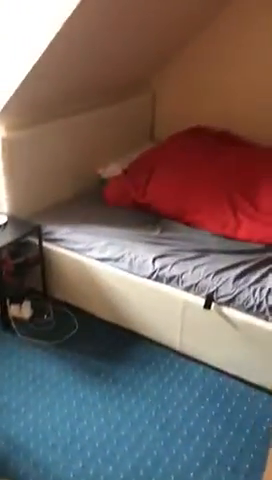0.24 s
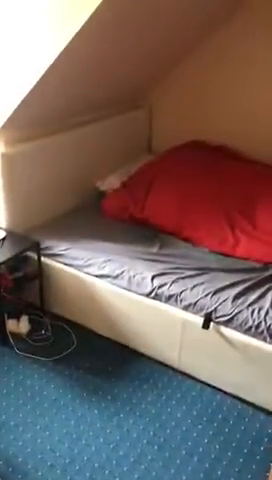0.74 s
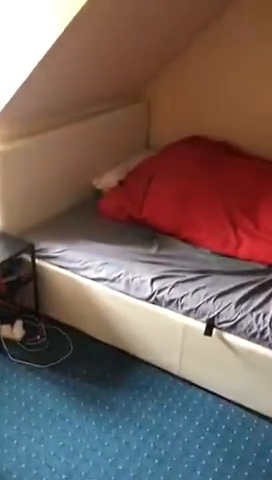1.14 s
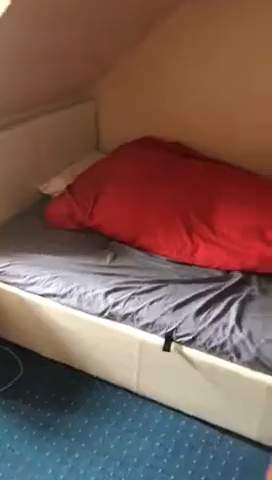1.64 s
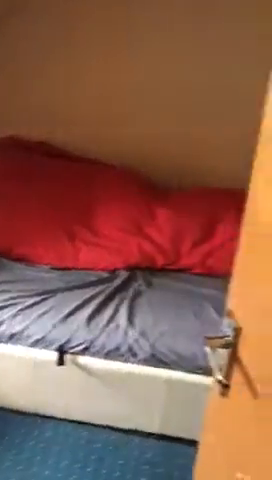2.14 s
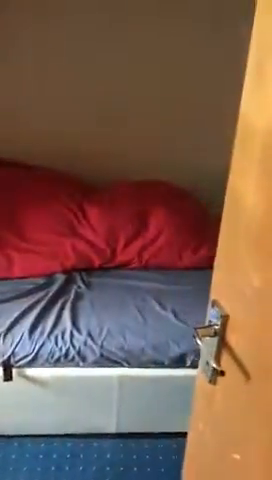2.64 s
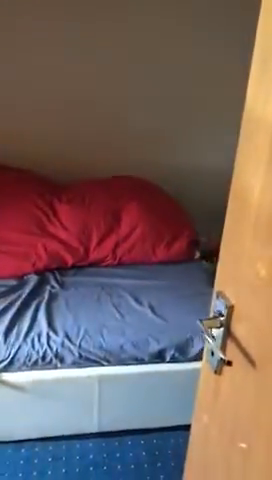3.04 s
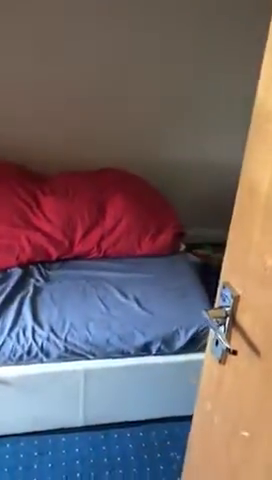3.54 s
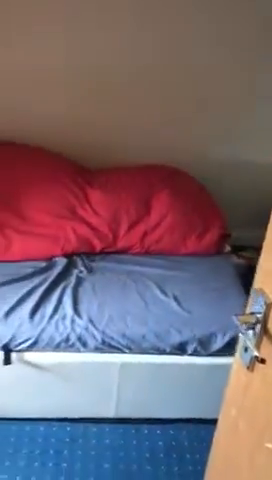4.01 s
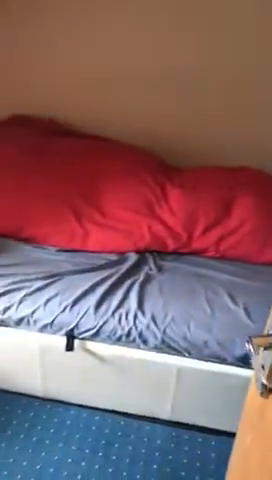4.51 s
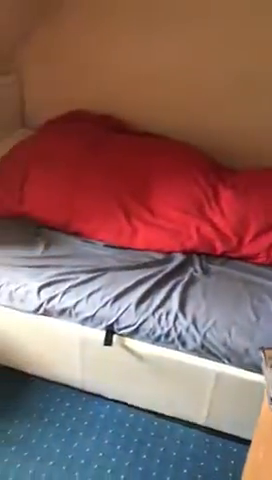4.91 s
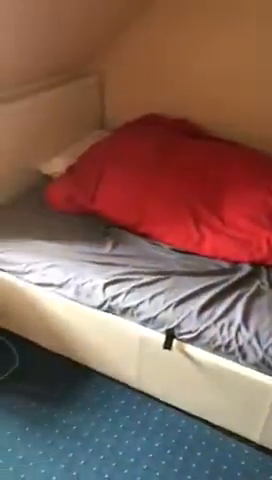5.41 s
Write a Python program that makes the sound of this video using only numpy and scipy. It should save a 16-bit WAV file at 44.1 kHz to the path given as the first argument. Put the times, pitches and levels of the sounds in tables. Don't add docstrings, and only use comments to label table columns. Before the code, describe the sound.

Dull, soft treads and low wooden creaks crowd the first second and a half, with quick finger ticks and a bump on the hand-held microphone. Socks brush carpet, then hollow heel knocks thud on attic boards in a close cluster, thin out, and return after a sharp joint snap. Small, dry carpeted bedroom, faint hush and low house rumble, mono.

```python
import sys
import numpy as np
from scipy import signal
from scipy.fft import rfft, irfft
from scipy.io import wavfile

SR = 44100
rng = np.random.default_rng(int(sys.argv[2]) if len(sys.argv) > 2 else 0)


def waveform_to_disk(signal):
    frames = np.transpose(np.atleast_2d(signal))
    scaled = np.clip(frames, -1, 1) * 32767
    samples = np.round(scaled).astype(np.int16)
    wavfile.write(sys.argv[1], SR, samples)


def voltage_ratio(decibels):
    exponent = np.asarray(decibels, float) / 20
    return 10 ** exponent


N = 249601
BLOW_SAMPLES = SR * 3 // 10


def rms_one(x):
    return x / np.sqrt(np.mean(x ** 2) + 1e-20)


def at_hz(points, hz):
    table = np.array(points)
    return np.interp(np.log(hz + 1), np.log(table[:, 0]), table[:, 1])


def coloured(spectrum, size=N):
    hz = np.arange(size // 2 + 1) * SR / size
    white = rfft(rng.standard_normal(size))
    return rms_one(irfft(white * voltage_ratio(at_hz(spectrum, hz)), size))


def flicker(rate_hz, spread_db):
    r = np.exp(-2 * np.pi * rate_hz / SR)
    drift = signal.lfilter([1], [1, -2 * r, r * r], rng.standard_normal(N + SR))
    return voltage_ratio(spread_db * rms_one(drift[SR:]))


def bell(peak_s, rise_s, fall_s, hold_s=0):
    t = np.arange(N) / SR - peak_s
    return np.exp(-0.5 * np.where(t < 0, t / rise_s, np.maximum(t - hold_s, 0) / fall_s) ** 2)


def swell(hz, swell_s, t):
    u = np.maximum(t, 0) / swell_s
    return (u / 3) ** 3 * np.exp(3 - u) * np.sin(2 * np.pi * hz * t)


# hz, t60_s
ROOM_T60 = [(80, 0.53), (210, 0.42), (560, 0.21), (1470, 0.23), (3880, 0.21), (10000, 0.15)]


def dying(spectrum, build_s, t60_share):
    t = np.arange(BLOW_SAMPLES) / SR
    noise = rfft(coloured(spectrum, size=BLOW_SAMPLES))
    hz = np.arange(len(noise)) * SR / BLOW_SAMPLES
    out = 0
    for low_hz in 40 * 2 ** np.arange(0, 8.5, 0.5):
        in_band = (hz >= low_hz) * (hz < low_hz * np.sqrt(2))
        t60_s = t60_share * at_hz(ROOM_T60, low_hz * 1.2)
        out = out + irfft(noise * in_band, BLOW_SAMPLES) * voltage_ratio(-60 * t / t60_s)
    return out * (1 - np.exp(-t / build_s))


def harder(spectrum, slope_db):
    slope_db = np.clip(slope_db, -12, 5)
    return [(hz, db + slope_db * np.log2(hz / 2000)) for hz, db in spectrum]


def add(out, start_s, sound):
    i = max(round(start_s * SR), 0)
    out[i:i + len(sound)] += sound[:N - i]


# hz, level_db_per_hz
DEEP = [(15, -59), (25, -26), (59, 4), (90, -5.5), (120, -13.5), (200, -120)]
RUMBLE = [(53, -35), (90, -3.5), (129, 1), (178, -11), (250, -6.5), (320, -65), (550, -120)]
DISTANT = [(120, -25), (200, 0.5), (438, -1.5), (588, -2), (739, -4.5), (831, -3), (1500, -19), (1950, -31),
           (3300, -120)]
# peak_s, deep_db, rumble_db
SWAYS = [(0, -62, -61.5), (.25, -75, -73), (.58, -67, -68), (.94, -68.5, -78), (1.28, -84, -66),
         (1.5, -79, -71), (1.86, -75, -73), (2.16, -53, -45), (2.4, -67, -64), (2.65, -67, -72),
         (2.87, -58, -59), (3.1, -84, -76), (3.53, -68, -59.5), (3.66, -64.5, -71), (4.07, -69, -78),
         (4.56, -72, -89), (4.72, -79, -54), (4.87, -59.5, -64), (5.04, -78, -61), (5.2, -74.5, -82)]
# peak_s, level_db
DISTANT_SWELLS = [
    (1, -91),
    (1.95, -78.5),
    (2.6, -64),
    (3.93, -79),
    (4.7, -80),
]


def house():
    deep, rumble, far = voltage_ratio(-83), voltage_ratio(-76.5), voltage_ratio(-74.5)
    for peak_s, deep_db, rumble_db in SWAYS:
        sway = bell(peak_s, rise_s=0.045, fall_s=0.052)
        deep = deep + voltage_ratio(deep_db) * sway
        rumble = rumble + voltage_ratio(rumble_db) * sway
    for peak_s, level_db in DISTANT_SWELLS:
        far = far + voltage_ratio(level_db) * bell(peak_s, 0.083, 0.083)
    out = deep * coloured(DEEP)
    out = out + rumble * flicker(17, 2.24) * coloured(RUMBLE)
    return out + far * flicker(23.5, 2.04) * coloured(DISTANT)


# hz, level_db_per_hz
HUSH = [(710, -25), (1200, -4.5), (2410, -6.5), (2650, -12.5), (3280, -9), (10200, -14), (11200, -14.5),
        (11800, -24), (15300, -55), (22000, -120)]


def hush():
    return voltage_ratio(-76.5) * coloured(HUSH)


# hz, level_db_per_hz
TAIL = [(59, -35), (100, -2.5), (207, 1), (494, 4.5), (786, 0.5), (921, -11), (1090, -17), (1240, -19),
        (1500, -19), (1950, -47), (3300, -120)]
CRACK = [(470, -14), (800, -9.5), (1070, -3), (1250, -12), (1490, -14.5), (2090, -12.5), (2280, -15),
         (3530, -19.5), (5330, -27.5), (5700, -31.5), (11500, -41.5), (15000, -78), (22000, -120)]
# start_s, peak_db, ring_hz, crack_db, hardness_db_per_octave
TREADS = [(0.043, -47.5, 470, -63.5, 3.5), (0.064, -39.5, 600, -52.5, -1), (0.107, -37.5, 496, -49.5, 2.5),
          (0.13, -33, 486, -64, 6), (0.165, -35.5, 447, -57, -2), (0.404, -42.5, 490, -59.5, -3.5),
          (0.4543, -31, 526, -52.5, -1), (0.468, -36, 490, -61, 1.5), (0.512, -35, 503, -60.5, -0.5),
          (0.57, -35, 565, -53, -3), (0.648, -28, 477, -48.5, -4), (0.786, -56, 453, -56, -13),
          (1.045, -46, 558, -69, 5), (1.208, -44, 646, -57, 18), (1.308, -46, 577, -62, -4),
          (1.342, -40.5, 547, -58.5, 0), (1.354, -49, 590, -59, -2.5), (1.503, -48.5, 553, -55.5, -4),
          (2.223, -41.5, 660, -65.5, -3)]


def treads():
    out, t = np.zeros(N), np.arange(BLOW_SAMPLES) / SR
    for start_s, peak_db, ring_hz, crack_db, hardness_db in TREADS:
        body = swell(ring_hz, 0.0011, t)
        body = body + voltage_ratio(-23) * swell(1.76 * ring_hz, 0.001, t)
        body = body + voltage_ratio(-7) * dying(TAIL, 0.0044, 0.84)
        add(out, start_s + 0.00046, voltage_ratio(peak_db) * body)
        crack = dying(harder(CRACK, hardness_db), 0.00083, 0.9) * (1 + 0.86 * np.exp(-t / 0.005))
        add(out, start_s - 0.0005, voltage_ratio(crack_db - 2) * crack)
    return out


def creak(modes, slips_per_s):
    out = 0
    for hz, width_hz, level_db in modes:
        slips = (rng.random(N) < slips_per_s / SR) * voltage_ratio(1.6 * rng.exponential(1, N))
        slips = slips * rng.choice([-1, 1], N)
        r = np.exp(-np.pi * width_hz / SR)
        poles = [1, -2 * r * np.cos(2 * np.pi * hz / SR), r * r]
        out = out + voltage_ratio(level_db) * rms_one(signal.lfilter([1, 0, -1], poles, slips + 1e-18))
    return rms_one(signal.sosfilt(signal.butter(1, 1500, fs=SR, output="sos"), out))


# hz, width_hz, level_db
STAIR_LOW = [(207, 31, -11), (263.2, 17, -5), (304.4, 28, -9.5)]
STAIR_HIGH = [(426, 44, 9.5), (490, 160, -19), (563, 73, 13), (680, 53, -32.5), (940, 64, -1)]
# start_s, hold_s, low_creak_db, high_creak_db
LOADS = [(0.065, .02, -56, -52), (0.105, 0.098, -50, -57.5), (0.432, .03, -52.5, -70),
         (0.461, 0.027, -62, -55.5), (0.546, 0.049, -49.5, -66), (0.656, 0.074, -56.5, -65),
         (1.112, 0.019, -61.5, -69.5), (1.17, 0.052, -55, -78), (1.267, 0.079, -58, -61),
         (1.377, 0.036, -60.5, -80), (1.512, 0.037, -58, -73), (2.232, 0.072, -67.5, -64.5)]


def shuffle():
    rise_s, fall_s, high_share = 0.017, 0.03, 0.72
    low, high = 0, 0
    for start_s, hold_s, low_db, high_db in LOADS:
        low = low + voltage_ratio(low_db) * bell(start_s, rise_s, fall_s, hold_s)
        high = high + voltage_ratio(high_db) * bell(start_s, rise_s, high_share * fall_s, high_share * hold_s)
    return low * creak(STAIR_LOW, 400) + high * creak(STAIR_HIGH, 500)


# hz, level_db_per_hz
PILE = [(290, -41), (500, -24), (611, -1.5), (1140, -12.5), (1340, -11), (3140, -3), (5030, -6), (5500, -8),
        (7150, -17), (12100, -120)]
FIBRES = [(2940, -6), (5000, -24), (5810, -6), (6410, 0), (11800, -7.5), (15300, -67), (22000, -120)]
# peak_s, dull_db, bright_db, rise_s, fall_s
STROKES = [(.11, -76, -79.5, 0.05, 0.11), (.855, -69, -78, 0.052, 0.05), (1.213, -67, -84, 0.0059, .02),
           (1.33, -71, -75, 0.032, 0.027), (1.4, -71, -77, 0.019, 0.042), (1.514, -67, -67.5, 0.019, 0.025),
           (1.795, -65, -77, 0.0079, 0.019), (1.85, -55, -69, 0.019, 0.021), (1.95, -75, -85, 0.034, 0.031),
           (2.75, -78, -79.5, 0.22, 0.11), (3.05, -73, -95, .003, 0.017), (3.579, -72, -75.5, 0.058, 0.067),
           (3.93, -75, -82, 0.074, 0.048), (4.055, -76.5, -86, 0.0075, .012),
           (4.84, -77, -91, 0.058, 0.078), (5.34, -78, -83, 0.0072, 0.0057)]


def brush():
    dull, bright = 0, 0
    for peak_s, dull_db, bright_db, rise_s, fall_s in STROKES:
        stroke = bell(peak_s, rise_s, fall_s)
        dull = dull + voltage_ratio(dull_db) * stroke
        bright = bright + voltage_ratio(bright_db) * stroke
    return flicker(71, 0.96) * (dull * coloured(PILE) + bright * coloured(FIBRES))


# hz, level_db_per_hz
SNAP_TAIL = [(180, -20), (300, 1), (390, -9), (657, -1), (766, -6), (1030, -1.5), (1510, -11.5),
             (3560, -1.5), (8550, -13.5), (11800, -23.5), (15300, -56), (22000, -120)]
# start_s, peak_db, low_ring_hz, high_ring_hz, high_ring_db
TICKS = [
    (0.743, -52.5, 1570, 2500, -12),
    (0.82, -41.5, 1160, 3800, -13),
    (0.8452, -52.5, 3480, 4470, -4),
    (.8628, -30, 1050, 2260, -10.5),
    (1.209, -55.5, 4540, 6500, 0.5),
    (3.0489, -63, 800, 1900, -14),
    (5.237, -66, 6330, 7500, -10),
    (1.685, -64, 2500, 6000, -2),
]
# start_s, hz, level_db, swell_s
BUMP = [(.8215, 645, -48, 0.00031), (.851, 750, -42.5, 0.0018), (0.858, 870, -33, 0.0015),
        (.8652, 628, -26, 0.00058), (.864, 453, -35, 0.00056), (0.871, 267, -40, 0.001),
        (0.878, 91, -37.5, 0.0013), (0.876, 920, -54, 0.0018), (3.0481, 1300, -47, 0.00059),
        (3.047, 2530, -59, 0.0012), (3.0482, 620, -51, 0.0004), (4.9575, 290, -50, 0.0021)]


def handling():
    out, t = np.zeros(N), np.arange(SR // 10) / SR
    for start_s, peak_db, low_hz, high_hz, high_db in TICKS:
        nail = coloured(SNAP_TAIL, size=len(t)) * np.exp(-t / 0.00084)
        tick = swell(low_hz, 0.00023, t) + voltage_ratio(high_db) * swell(high_hz, 0.00044, t)
        tick = tick + voltage_ratio(0.5 + 0.67 * high_db) * nail
        tick = tick + voltage_ratio(-10) * swell(8600, 0.00004, t)
        add(out, start_s - 0.0005, voltage_ratio(peak_db) * tick)
    for start_s, hz, level_db, swell_s in BUMP:
        add(out, start_s, voltage_ratio(level_db) * swell(hz, swell_s, t))
    return out


# delay_s, hz, level_db, swell_s
BOARD = [(0.0005, 334.2, 4, 0.002), (0.0018, 550, -11, 0.0023), (0.002173, 605.5, -2.5, 0.002),
         (0.0012, 845, -23.5, 0.0024), (0.00082, 1070, -25, 0.0023), (.0003, 1640, -29, 0.0004),
         (.016, 640, -11, 0.0022)]
CAVITY = [(0.0013, 108, -52, 0.0013), (0.0306, 135.7, -2.5, 0.0032), (0.0059, 83.8, -14.5, 0.0093),
          (0.0418, 77.2, -28, 0.021), (.075, 129, -32, 0.021)]
# delay_s, level_db
WALLS = [(0.014, -13), (.021, -16.5), (0.03, -32), (.037, -17), (0.048, -29)]
# hz, level_db, t60_s
JOISTS = [(152.2, -13, 0.2), (208, -22.5, 0.24), (274, -29, 0.2), (325.2, -12, 0.21), (361.2, -17.5, 0.26),
          (464, -7.5, 0.057), (509, -22.5, 0.24), (586, -27.5, 0.39), (628.8, 0, 0.066), (713, -17, 0.15),
          (774, -32.5, 0.16), (938, -23.5, 0.22), (1120, -58, 0.067)]
# hz, swell_s
HEEL = (3030, 0.0006)
# start_s, peak_db, crack_db, boom_db, hardness_db_per_octave
KNOCKS = [(2.072, -48.5, -74, 12, 5), (2.095, -32.5, -72, 3.5, 4), (2.138, -34, -61, 2.5, -5.5),
          (2.392, -24.5, -42, -2.5, 0), (2.525, -26.5, -44.5, -3, -1.5), (2.625, -28.5, -44, -4, -5),
          (2.755, -28, -42.5, -5, -3.5), (2.83, -33, -52, -7, -8.5), (3.2548, -31.5, -45, -1.5, -10),
          (3.538, -32, -44.5, -4.5, -8.5), (4.664, -28.5, -45, -2, -4.5), (4.732, -31.5, -52.5, 0, -7),
          (4.9642, -31, -48, -1, -5.5)]


def knocks():
    out, t = np.zeros(N), np.arange(BLOW_SAMPLES) / SR
    boards = sum(voltage_ratio(db) * swell(hz, swell_s, t - delay_s) for delay_s, hz, db, swell_s in BOARD)
    boards = boards + sum(voltage_ratio(db) * np.interp(t - delay_s, t, boards) for delay_s, db in WALLS)
    joists = 0
    for k, (hz, level_db, t60_s) in enumerate(JOISTS):
        joists = joists + (-1) ** k * voltage_ratio(level_db - 60 * t / t60_s) * np.sin(2 * np.pi * hz * t)
    boards = boards + joists * (1 - np.exp(-(t / 0.004) ** 2))
    boom = sum(voltage_ratio(db) * swell(hz, swell_s, t - delay_s) for delay_s, hz, db, swell_s in CAVITY)
    for start_s, peak_db, crack_db, boom_db, hardness_db in KNOCKS:
        scatter = voltage_ratio(-13) * dying(TAIL, 0.009, 1.1)
        add(out, start_s - 0.0006, voltage_ratio(peak_db - 1) * (boards + voltage_ratio(boom_db) * boom + scatter))
        crack = dying(harder(CRACK, hardness_db), 0.00015, 0.79) * (1 + 0.38 * np.exp(-t / 0.0027))
        add(out, start_s - 0.0007, voltage_ratio(crack_db) * crack)
        heel_db = crack_db + 0.5 + 2 * min(hardness_db, 0)
        add(out, start_s, voltage_ratio(heel_db) * swell(*HEEL, t))
    return out


# start_s, peak_db, hz
SNAP = [
    (4.478, -41, 1540),
    (4.4809, -20.5, 3260),
    (4.4808, -46, 10400),
]
# start_s, hz, level_db, swell_s
SNAP_BODY = [
    (4.481, 253, -41.5, .002),
    (4.507, 153, -47.5, 0.0045),
]


def snap():
    out, t = np.zeros(N), np.arange(BLOW_SAMPLES) / SR
    for start_s, peak_db, hz in SNAP:
        add(out, start_s, voltage_ratio(peak_db) * swell(hz, 0.0001, t))
    for start_s, hz, level_db, swell_s in SNAP_BODY:
        add(out, start_s, voltage_ratio(level_db) * swell(hz, swell_s, t))
    add(out, SNAP[0][0], voltage_ratio(-39) * dying(SNAP_TAIL, 0.00041, 0.81))
    return out


def scene():
    floor = house() + hush()
    steps = treads() + shuffle() + brush() + knocks()
    return (floor + steps + handling() + snap())[None]


def top_cut(x):
    return signal.sosfilt(signal.butter(12, 12300, fs=SR, output="sos"), x)


def record(dry):
    mix = signal.sosfilt(signal.butter(3, 40, "high", fs=SR, output="sos"), dry)
    return top_cut(mix)


dry = scene()
out = record(dry)
waveform_to_disk(out)
```